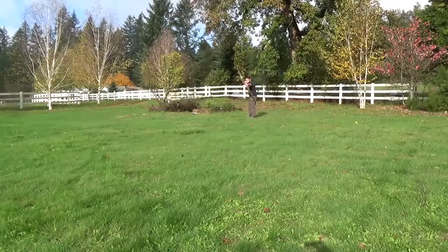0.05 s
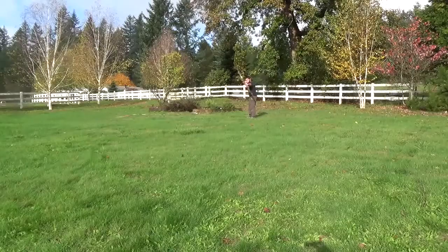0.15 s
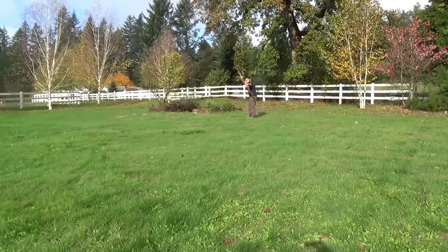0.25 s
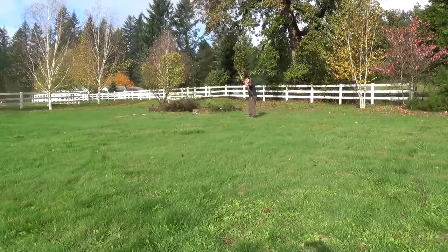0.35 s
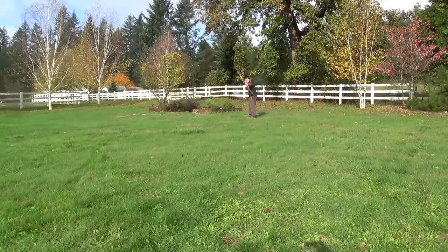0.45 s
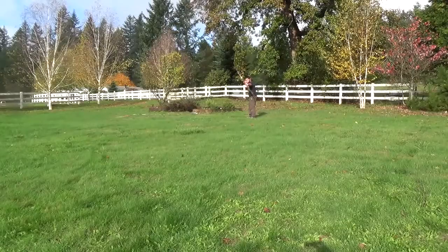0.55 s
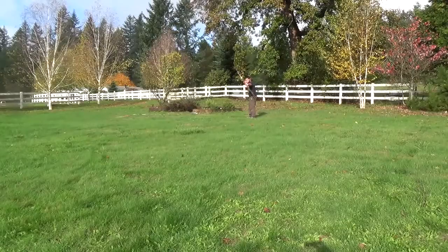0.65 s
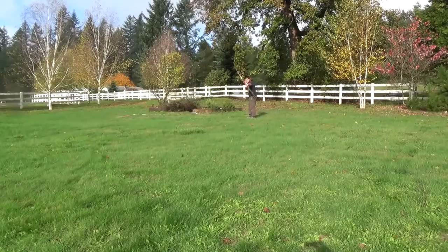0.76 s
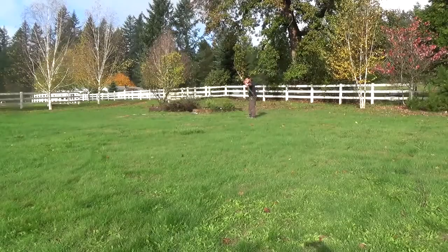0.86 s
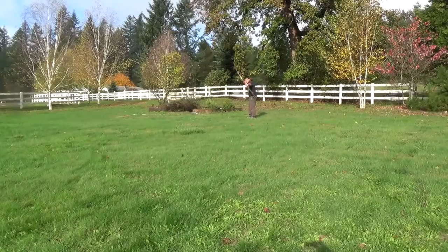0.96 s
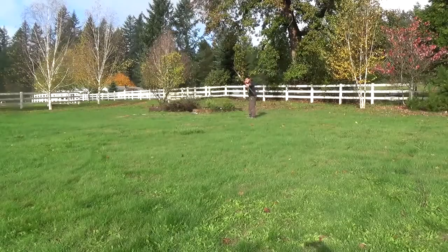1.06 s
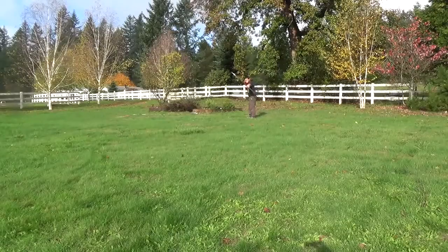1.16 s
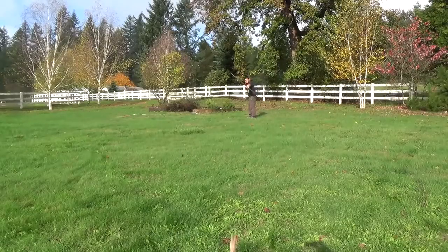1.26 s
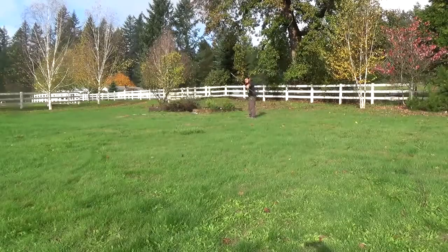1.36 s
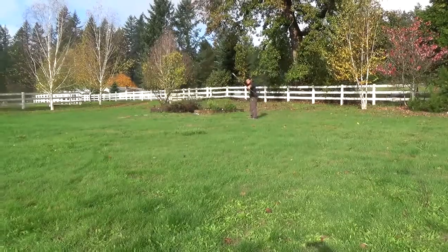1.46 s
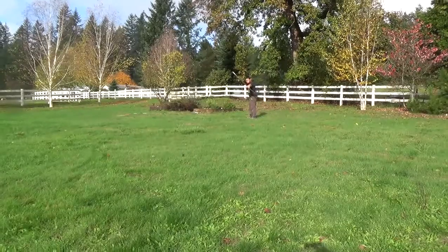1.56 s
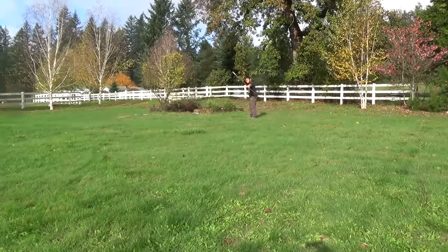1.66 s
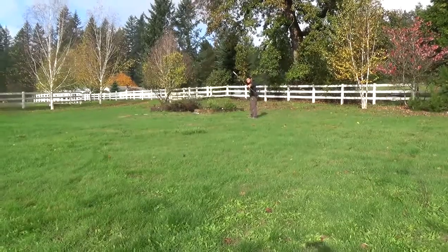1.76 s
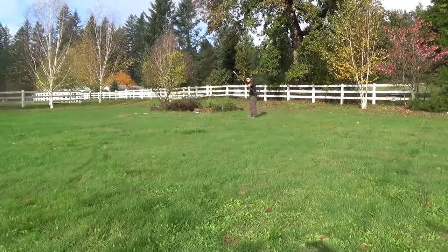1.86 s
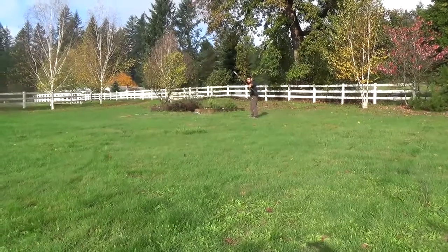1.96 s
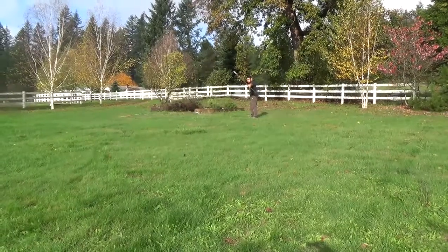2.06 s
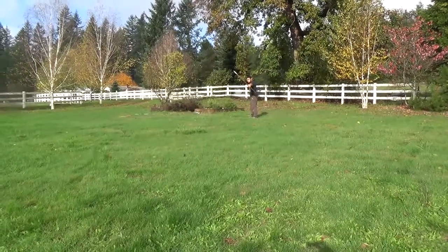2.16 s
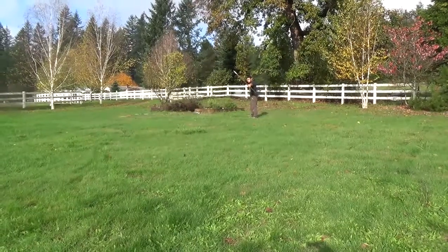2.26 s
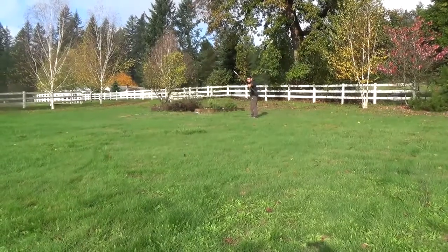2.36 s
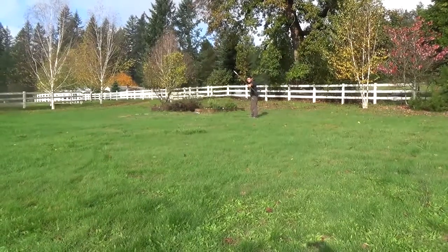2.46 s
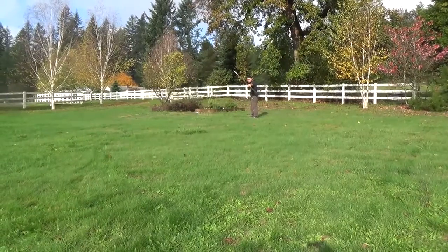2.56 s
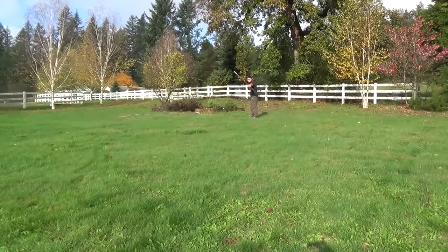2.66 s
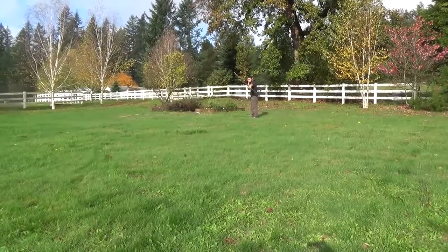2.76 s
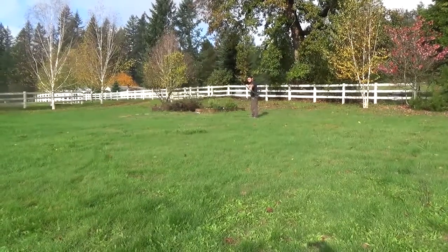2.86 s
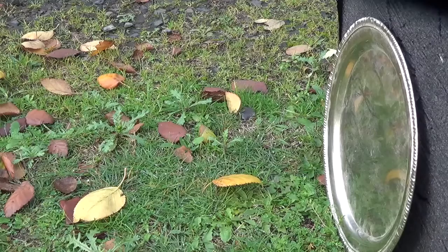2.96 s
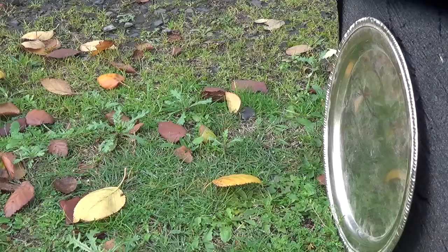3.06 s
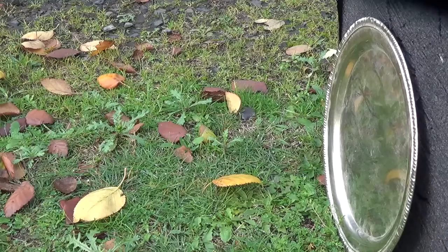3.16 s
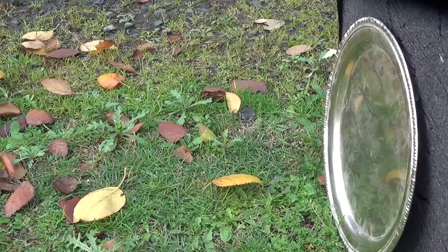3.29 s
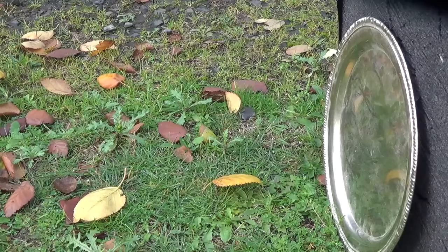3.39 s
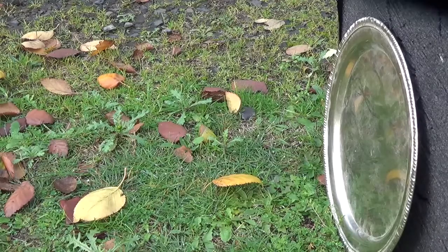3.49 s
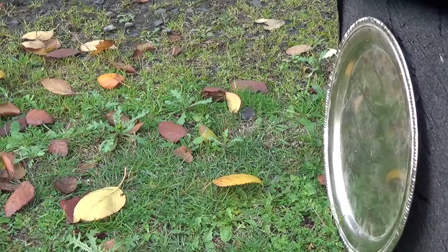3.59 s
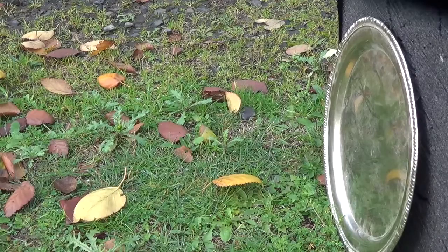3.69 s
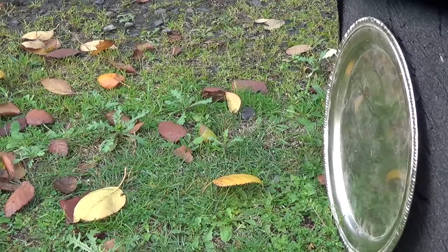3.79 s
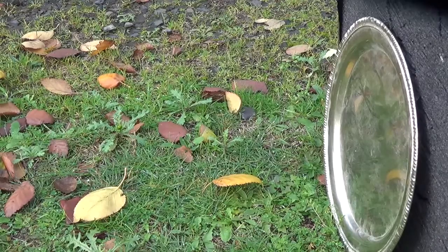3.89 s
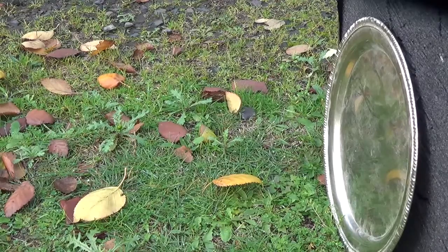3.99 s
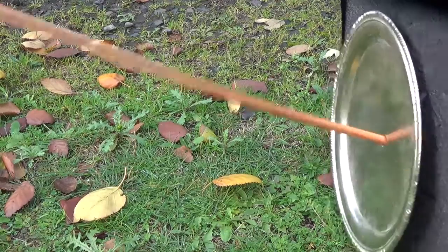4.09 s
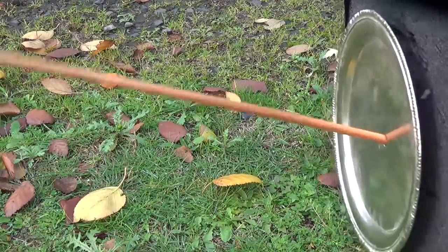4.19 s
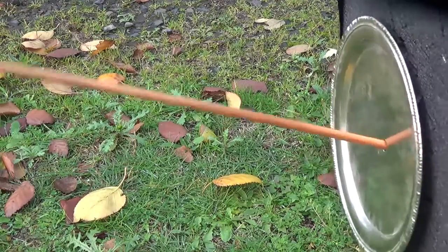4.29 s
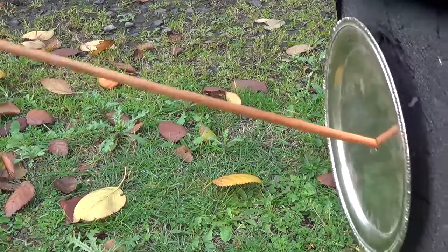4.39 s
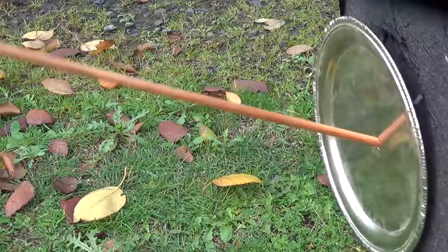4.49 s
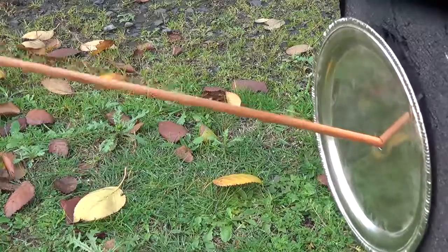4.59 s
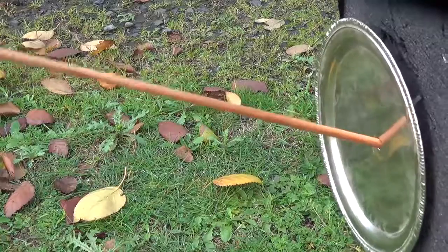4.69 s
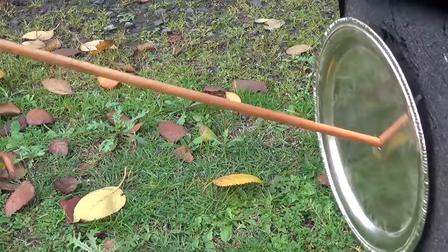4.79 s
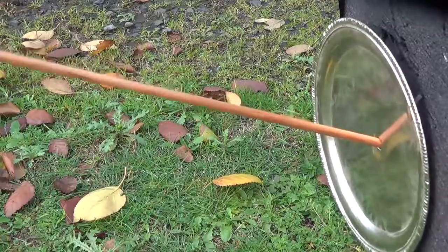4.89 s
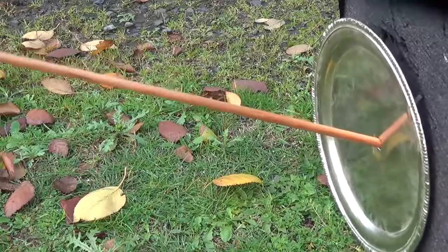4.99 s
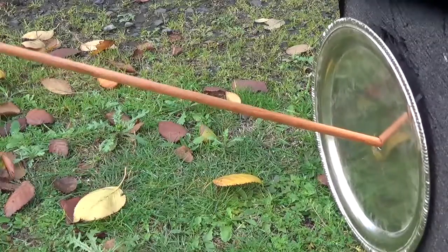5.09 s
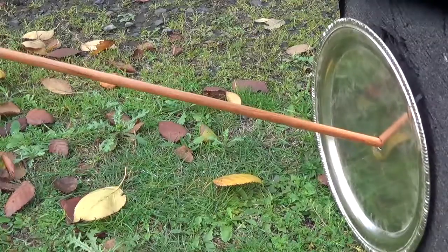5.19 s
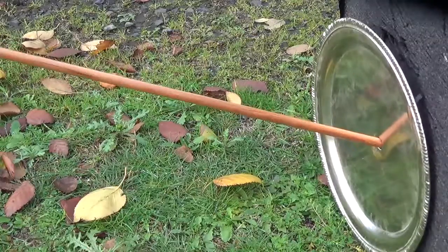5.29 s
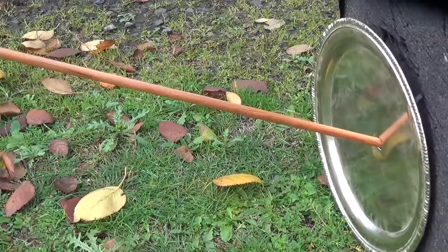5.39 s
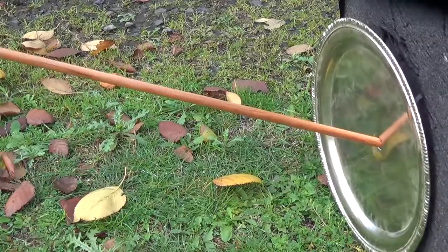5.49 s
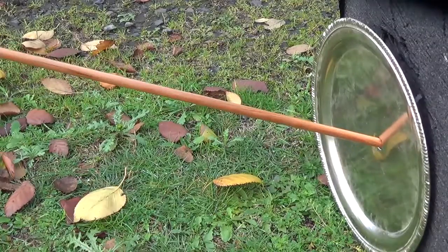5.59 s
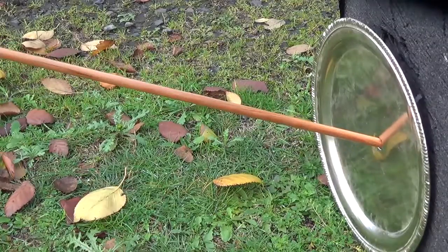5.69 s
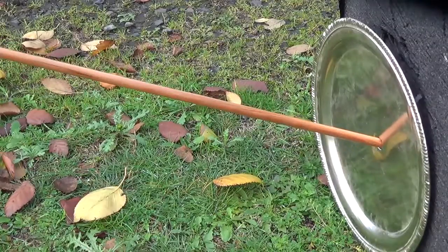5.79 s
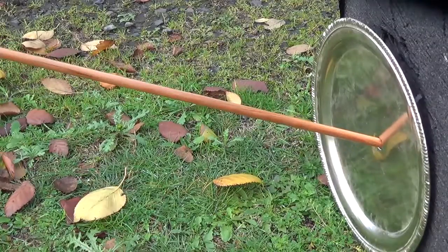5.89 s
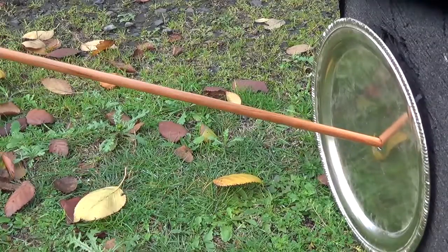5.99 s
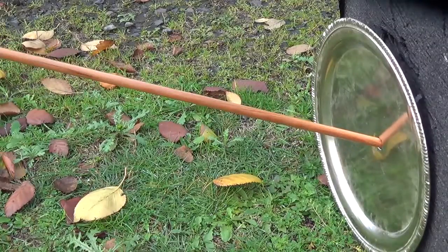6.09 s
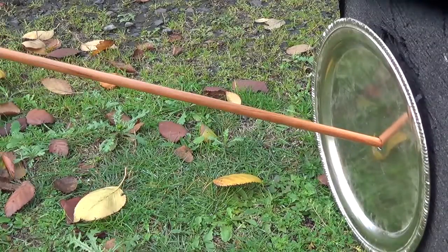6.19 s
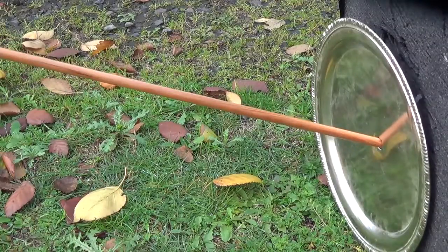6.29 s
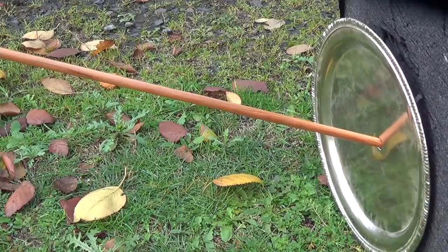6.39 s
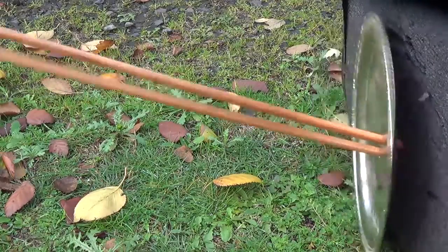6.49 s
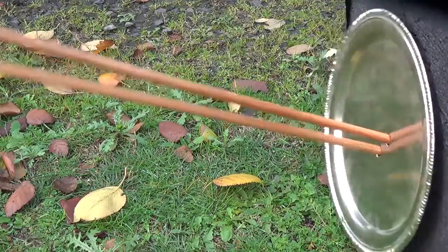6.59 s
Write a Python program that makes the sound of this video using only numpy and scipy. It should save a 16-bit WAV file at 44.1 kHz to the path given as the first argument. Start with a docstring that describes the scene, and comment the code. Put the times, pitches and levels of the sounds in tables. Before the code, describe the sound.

A quiet lawn: low uneven rumble, gentle air in trees, thin hiss, and a faint airy whistle around 0.3-0.5 s. At 1.14 s a distant wooden bow snaps very softly; its arrow's faint hiss swells until a loud, dry, sharp smack with a short thump at 1.39 s, right by the microphone. From 1.47 to 1.65 s wood clatters in irregular scrapes and knocks, strongest at 1.52, then soft dull thuds on grass until 2.0 s. At 3 s the air grows quieter, with a barely audible fast lens ticking. At 4.12 s a nearby bow clicks and twangs, and at 4.17 s an arrow cracks through a metal tray: a bright crash, buzzing and chattering, ringing for about half a second. A tiny settling tap comes at 4.8 s. Quiet returns until another bow release at 6.53 s and a second metallic crash at 6.58 s, buzzing less, still fading as it ends.

```python
"""Two arrows shot from close by pierce a metal tray on a quiet lawn: noise bursts for the crack, a
wash of noise and paired beating modes for the sheet that buzzes on the shaft and rings briefly.
Before them a far wooden bow snaps, its arrow hisses in as noise and smacks into the target by the
microphone, and wood clatters down onto the grass: short noise contacts, some with damped modes.
Behind lie a low rumble, air in the trees, thin hiss, faint far tones and a ticking lens drive."""
import sys
import numpy as np
from scipy import signal
from scipy.fft import rfft, irfft, next_fast_len
from scipy.io import wavfile
from scipy.ndimage import map_coordinates

SR = 44100
rng = np.random.default_rng(int(sys.argv[2]) if len(sys.argv) > 2 else 0)


def wav_record(signal):
    """Record a signal, one row per channel, as 16-bit PCM in the file named by sys.argv[1]."""
    frames = np.transpose(np.atleast_2d(signal))
    bounded = np.clip(frames, -1, 1)
    # unit amplitude maps onto the largest positive 16-bit level
    quanta = np.round(bounded * 32767).astype(np.int16)
    wavfile.write(sys.argv[1], SR, quanta)


N = 293265
T = np.arange(SR) / SR  # time since a blow (s)
CLOCK = np.arange(N) / SR  # time in the scene (s)
CLOSE_UP_S = 3.0  # the camera moves up to the tray
TOP_HZ = 11080  # upper limit of the noise colours

# bow shots: (release [s], click level [dB], string stop [s], slap level [dB], limb hum level [dB])
BOW_SHOTS = [(1.1400, -53, 1.1560, -51, -57), (4.1210, -43, 4.1365, -34.5, -37.5),
             (6.5313, -41, 6.5470, -45, -35.5)]
# colour of the string snapping taut and of the point cracking through: (frequency [Hz], level [dB])
SLAP_COLOUR = [(60, -6), (200, 1), (700, 2.5), (2500, -0.5), (5000, -4.5), (11000, -5)]
# the arrow driving into the target: (time [s], level [dB], length [s], t60 [s], tilt [dB/octave])
TARGET_ENTRY = [(1.3903, -13.5, .0018, 0.009, -0.5), (1.3949, -24, .004, .014, 0)]
# the tray's crowd of modes, read between these points:
# (frequency [Hz], level [dB], hold under full buzzing [s], t60 [s])
SHEET_CROWD = [(50, -34, 0.024, .6), (198.2, -4.5, 0.035, 1), (322, -6.5, .08, .9), (698, -4, 0.1, 0.84),
               (1050, 3.5, 0.14, .5), (1330, -7, 0.16, 0.56), (2150, -6, 0.17, 0.47),
               (2640, -1.5, 0.12, .38), (2770, -5.5, 0.14, 0.63), (2980, 2, 0.13, .35),
               (3730, 0, 0.13, 0.26), (5200, -3.5, .08, 0.42), (6200, -1.5, .045, 0.4),
               (10500, 3, 0.012, 0.29)]


def amp(db):
    """Decibels to gain."""
    return 10 ** (np.asarray(db) / 20)


def unit(x):
    """Scale to rms 1."""
    return x / np.sqrt(np.mean(x ** 2) + 1e-20)


def along(points, hz, axis=1):
    """One column of a table, read on a log-frequency axis."""
    columns = np.transpose(points)
    return np.interp(np.log(hz + 1), np.log(columns[0]), columns[axis])


def octaves(hz):
    """Octaves above about 2 kHz, flattening toward the deepest bass."""
    return np.log2((hz + 50) / 2000)


def filtered(x, response):
    """x times a response of frequency."""
    n = x.shape[-1]
    m = next_fast_len(n + SR // 4)
    spectrum = rfft(x, m) * response(np.fft.rfftfreq(m, 1 / SR))
    return irfft(spectrum, m)[..., :n]


def noise(colour, size, tilt_db=0):
    """Coloured noise of rms 1, thinned below 40 Hz and cut at TOP_HZ."""
    def response(hz):
        bass_cut = hz ** 2 / (hz ** 2 + 40 ** 2)
        return amp(along(colour, hz) + tilt_db * octaves(hz)) * (hz < TOP_HZ) * bass_cut

    return unit(filtered(rng.standard_normal(size), response))


def wobble(rate, size):
    """A smooth random curve, rate knots a second."""
    knots = rng.standard_normal(int(size * rate / SR) + 4)
    return map_coordinates(knots, [np.arange(size) * rate / SR])


def add(track, s, sound):
    """Mix a sound into the track at time s."""
    part = track[round(s * SR):][:len(sound)]
    part += sound[:len(part)]


def burst(colour, length, t60, tilt_db=0):
    """A contact: gritty noise that lasts for its length and then dies."""
    grit = unit(amp(1.4 * wobble(900, SR)))
    envelope = amp(-60 * np.maximum(T - length, 0) / t60)
    return grit * noise(colour, SR, tilt_db) * envelope


def ring(modes, attack=0.00016):
    """Damped modes struck together."""
    modes_sum = sum(amp(db - 60 * T / t60) * np.sin(2 * np.pi * hz * T) for hz, db, t60 in modes)
    return modes_sum * (1 - np.exp(-T / attack))


def panned(db):
    """Gains of the two channels for a left-right difference."""
    return amp([[db / 2], [-db / 2]])


def wide(colour, side_db):
    """Stereo noise of rms 1, its width set by the side level."""
    mid = noise(colour, N)
    side = amp(side_db) * noise(colour, N)
    return unit(np.array([mid + side, mid - side]))


def outdoors(x, pan, scatter, echo_db):
    """Place a small source: no deep bass radiates, near things scatter it, trees answer faintly and dully."""
    x = filtered(x, lambda hz: (1j * hz) ** 2 / (60 ** 2 + 1j * hz * 75 - hz ** 2))
    near = rng.standard_normal(SR) * amp(-60 * T / .06)
    scattered = signal.fftconvolve(x, near / np.linalg.norm(near))[:N]
    side = filtered(scattered, lambda hz: amp(along(scatter, hz)))
    far = rng.standard_normal((2, SR)) * amp(-60 * T / 1.3)
    far = filtered(far, lambda hz: 1 / (1 + (hz / 1400) ** 4))
    echo = signal.fftconvolve(x[None], far / np.linalg.norm(far[0]), axes=1)[:, :N]
    stereo = np.array([x + side, x - side]) + amp(echo_db) * echo
    return filtered(stereo, lambda hz: amp(np.outer([.5, -.5], along(pan, hz))))


def background():
    """Low rumble, air in the trees, thin hiss and far tones; trees and hiss are quieter by the tray."""
    # colours of the rumble, the trees and the hiss: (frequency [Hz], level [dB])
    rumble_colour = [(25, -10), (50, -4), (85, 3), (115, 0.5), (160, -6), (300, -18.5), (700, -59.5)]
    trees_colour = [(100, -23), (210, -0.5), (350, -3.5), (600, -3.5), (1050, -1), (2000, -9), (4000, -17),
                    (8000, -50)]
    hiss_colour = [(1500, -19.5), (3500, 0), (11000, -3.5)]
    # course of the rumble, before its overall gain: (time [s], level [dB])
    rumble_course = [(0.0, -74), (1.8, -72), (3.02, -78), (4.37, -69.5), (6.02, -80.5), (6.65, -74.5)]
    # two whistles and a drone:
    # (start [s], end [s], frequency [Hz], width [Hz], level [dB], left-right [dB])
    far_tones = [(0.31, 0.506, 1080, 120, -70, 3.5), (6.15, 6.77, 2640, 370, -75, 7),
                 (2.9, 4.25, 78, 5, -67.5, -16)]
    rumble_gain_db = 4.5

    close = CLOCK > CLOSE_UP_S
    rumble_db = rumble_gain_db + np.interp(CLOCK, *np.transpose(rumble_course))
    rumble = amp(rumble_db + 0.76 * wobble(8.2, N)) * wide(rumble_colour, side_db=-9.0)
    out = rumble * np.where(close, panned(-7.5), panned(-3))
    trees = amp(np.where(close, -71.5, -69)) * wide(trees_colour, side_db=-12)
    out += trees * np.where(close, panned(-2.5), panned(-.5))
    out += amp(np.where(close, -79.5, -74.7)) * wide(hiss_colour, side_db=-8.5)
    for start, end, hz, width_hz, db, pan_db in far_tones:
        progress = np.clip((CLOCK - start) / (end - start), 0, 1)
        swell = np.sqrt(np.abs(np.sin(np.pi * progress)))
        resonance = lambda f: 1 / (1 + (2 * (f - hz) / width_hz) ** 2)
        tone = unit(filtered(rng.standard_normal(N), resonance))
        out += amp(db) * swell * tone * panned(pan_db)
    return out


def camera_ticks():
    """By the tray the lens drive ticks faintly and unevenly each frame, brighter on every other one."""
    frame_rate = 29.97  # frames per second
    frame, since = np.divmod(CLOCK - 3.017, 1 / frame_rate)
    pulse = np.exp(-((since - .004) / 0.0027) ** 2) * (CLOCK > CLOSE_UP_S)
    lower = amp(-72.5 + 1.5 * wobble(30, N)) * np.sin(2 * np.pi * 2900 * since)
    upper = amp(-78.0 + 1.5 * wobble(30, N)) * np.sin(2 * np.pi * 3300 * since) * (frame % 2 == 0)
    return pulse * (lower + upper)


def soft_thuds():
    """Wood landing on the grass, and at 4.80 s the tray settling: short noise contacts, damped alike."""
    # each thud: (time [s], level [dB], tilt [dB/octave])
    thuds = [(1.751, -50, -13), (1.786, -50.5, 1.5), (1.8544, -39.5, .5), (1.879, -55, -8),
             (1.999, -59.5, 2.5), (4.803, -62, 5)]
    # colour of the thuds: (frequency [Hz], level [dB])
    thud_colour = [(60, -9.5), (250, 11), (650, 1), (1300, -6.5), (2500, -23.5), (5000, -33), (11000, -39)]
    out = np.zeros(N)
    for s, db, tilt_db in thuds:
        add(out, s, amp(db) * burst(thud_colour, length=0.0032, t60=0.078, tilt_db=tilt_db))
    return out


def clatter():
    """Wood scrapes and knocks; the point of contact decides which of its modes ring most."""
    # each contact: (time [s], level [dB], length [s], tilt [dB/octave], favoured frequency [Hz])
    wood_contacts = [(1.4705, -47.5, .001, -4.5, 1570), (1.476, -46.5, 0.0011, -4, 1050),
                     (1.505, -47, .016, 1.5, 3500), (1.5243, -25.3, 0.0031, 0.5, 2150),
                     (1.532, -35.5, 0.0092, -3.5, 480), (1.5433, -36.5, 0.0024, -0.5, 2150),
                     (1.558, -42.5, 0.0093, -0.5, 240), (1.574, -35, .006, -1.1, 2150),
                     (1.591, -38.5, .001, 2.5, 1570), (1.622, -39.5, 0.00092, 1, 2150),
                     (1.637, -49.5, 0.0055, 0, 1050), (1.694, -63.5, 0.0026, 2, 3500),
                     (1.808, -62, .0044, 2.5, 3500)]
    # colour of the contacts: (frequency [Hz], level [dB])
    wood_colour = [(60, -7.5), (230, 5.5), (500, 0.5), (1000, 4.5), (1500, -4.5), (2150, 1), (3000, -8.5),
                   (6000, -12.5), (11000, -15)]
    # modes of the wood: (frequency [Hz], level at the favoured pitch over the ring level [dB], t60 [s])
    wood_modes = [(240, 7, 0.17), (480, 4.5, 0.066), (1050, 3, .042), (1570, 5, .035), (2150, 2, 0.027),
                  (3500, 4, 0.022)]
    favour_db_per_octave = 14  # how fast the ring weakens away from the favoured pitch
    # contacts over hard_db press on the wood: choke is the share of the excess dB that does not ring
    hard_db, choke = -38.5, .6

    out = np.zeros(N)
    for s, db, length, tilt_db, favoured_hz in wood_contacts:
        ring_db = db - choke * max(db - hard_db, 0)
        modes = []
        for hz, mode_db, t60 in wood_modes:
            distance_octaves = abs(np.log2(hz / favoured_hz))
            modes.append((hz, mode_db - favour_db_per_octave * distance_octaves, t60))
        contact = amp(db) * burst(wood_colour, length, t60=.037, tilt_db=tilt_db)
        add(out, s, contact + amp(ring_db) * ring(modes, attack=0.0007))
    return out


def flight():
    """From the first release to impact the fletching hisses, louder as the distance shrinks."""
    arrival_db, miss_m, speed_m_per_s = -51, 0.99, 82  # level on arrival, nearest distance, arrow speed
    fletching_colour = [(300, -2), (2500, 0.5), (7000, -0.5), (11000, 0.95)]  # (frequency [Hz], level [dB])
    release, arrival = BOW_SHOTS[0][0], TARGET_ENTRY[0][0]
    distance = miss_m + speed_m_per_s * np.abs(arrival - CLOCK)
    airborne = (CLOCK > release) & (CLOCK < arrival)
    return amp(arrival_db) * miss_m / distance * airborne * noise(fletching_colour, N)


def target_hit():
    """The arrow tears into the target and stops with a thump that sets it ringing."""
    # colour of the smack: (frequency [Hz], level [dB])
    smack_colour = [(60, -9.5), (200, -2), (500, 3), (1200, -2), (2000, 3), (3000, -7.5), (6000, -9.5),
                    (11000, -11.5)]
    # modes of the target: (frequency [Hz], level [dB], t60 [s])
    target_modes = [(110, -34.5, 0.26), (194, -31.5, .08), (298, -28.5, .19), (524, -19.5, 0.043),
                    (570, -38, .06), (730, -8, 0.0086), (1050, -17.5, 0.0062)]
    out = np.zeros(N)
    for s, db, length, t60, tilt_db in TARGET_ENTRY:
        add(out, s, amp(db) * burst(smack_colour, length, t60, tilt_db))
    # the small target face radiates little bass
    thump = filtered(ring(target_modes), lambda hz: (1j * hz / (110 + 1j * hz)) ** 2)
    add(out, 1.3991, thump)
    add(out, 1.400, amp(-40) * burst(smack_colour, length=0.0022, t60=0.037, tilt_db=2.1))
    return out


def bow():
    """The arrow clicks off the string; the string snaps taut, the departing arrow hisses, and the limbs hum."""
    # colour of the arrow leaving the string: (frequency [Hz], level [dB])
    click_colour = [(200, -11.5), (900, -11), (2100, 2.5), (3600, -8.5), (5500, -18.5), (11000, -22.5)]
    # modes of the limbs: (frequency [Hz], level over the shot's hum level [dB], t60 [s])
    limb_modes = [(189.5, 0, 0.25), (123, -11.5, 0.067), (390, -9, 0.092)]
    out = np.zeros(N)
    for release, click_db, stop, slap_db, hum_db in BOW_SHOTS:
        add(out, release, amp(click_db) * burst(click_colour, length=.004, t60=0.072))
        add(out, stop, amp(slap_db) * burst(SLAP_COLOUR, length=0.0041, t60=0.02))
        # the hiss of the arrow flying off
        add(out, stop, amp(hum_db - 15.5) * burst(SLAP_COLOUR, length=.018, t60=.07))
        add(out, stop + .002, amp(hum_db) * ring(limb_modes))
    return out


def tray_modes(hz, db, t60, buzz):
    """The buzzing sheet feeds its modes and makes them waver; then they die freely."""
    hold = buzz * along(SHEET_CROWD, hz, axis=2)
    knee = 0.018  # softness of the turn from held to free (s)
    free = knee * np.logaddexp(0, (T - hold[:, None]) / knee)
    swell = 1 - 0.5 * np.exp(-T / 0.013)
    # the swinging shaft trades energy between the modes and bends their pitch
    trade_db = 2.6 * np.array([wobble(30, SR) for _ in hz])
    bend = 0.75 * np.array([wobble(45, SR) for _ in hz]) * np.exp(-T / .5)
    turn, twin_turn, split = rng.random((3, len(hz), 1))
    phase = 2 * np.pi * (hz[:, None] * T + turn) + bend
    # the round tray's modes come in close pairs that beat, up to 14 Hz apart
    twin = amp(-6.5) * np.sin(phase + 2 * np.pi * (28 * (split - .5) * T + twin_turn))
    envelope = amp(db[:, None] - 1 + trade_db - 60 * free / t60[:, None])
    return swell * np.sum(envelope * (np.sin(phase) + twin), axis=0)


def tray_wash(buzz, tilt_db):
    """Hundreds of uneven, overlapping modes merge into a crash that loses its treble first."""
    grid = np.arange(0, SR / 2, 18)  # one random strength every 18 Hz
    strengths = amp(3.8 * rng.standard_normal(len(grid)))
    crowd = unit(filtered(rng.standard_normal(SR), lambda hz: np.interp(hz, grid, strengths)))
    hz, t, z = signal.stft(crowd, SR, nperseg=512)
    db, hold, t60 = (along(SHEET_CROWD, hz, axis=k)[:, None] for k in range(1, 4))
    knee = 0.026  # softness of the turn from held to free (s)
    free = knee * np.logaddexp(0, (t - buzz * hold) / knee)
    decay = amp(db + tilt_db * octaves(hz)[:, None] - 60 * free / t60)
    return signal.istft(z * decay, SR, nperseg=512)[1][:SR]


def tray():
    """The steel point cracks through; the sheet crashes, chatters on the shaft and rings."""
    # arrows through the tray:
    # (time [s], level [dB], main modes' trim [dB], share of the full buzz time [1], tilt [dB/octave])
    tray_hits = [(4.1676, -0.5, 0, 0.93, 1), (6.579, 0, -5.5, 0.49, 0.4)]
    # the strongest modes, before each hit's trims: (frequency [Hz], level [dB], t60 [s])
    main_modes = [(209.7, -46, .8), (736, -48.5, 1.4), (923, -42, 0.74), (1005, -39, .45),
                  (1109, -39.5, 0.41), (1214, -40, 0.41), (1944, -33.5, 0.55), (1984, -39.5, 0.52),
                  (2263, -46.5, 0.61), (2570, -41.5, 0.65), (2606, -44, 0.38), (2856, -39, 0.6),
                  (2994, -34.5, 0.47), (3190, -38.5, 0.5), (3235, -37.5, .36), (3340, -40.5, .3),
                  (3456, -41, .3), (3595, -39.5, 0.42), (3812, -34.5, .28), (3748, -34, .28),
                  (3973, -43, 0.44), (4231, -43.5, .3), (4460, -38.5, 0.25), (4650, -31.5, 0.345),
                  (4703, -35, 0.39), (5740, -38.5, 0.42), (6300, -42, 0.43), (8496, -39, .26),
                  (8474, -39.5, 0.21), (9940, -39.5, .26)]
    out = np.zeros(N)
    hz, db, t60 = np.transpose(main_modes)
    for s, level_db, modes_db, buzz, tilt_db in tray_hits:
        chatter = amp(1.2 * wobble(350, SR) + 1.7 * wobble(60, SR))
        wash = amp(-20) * chatter * tray_wash(buzz, tilt_db)
        add(out, s, amp(level_db - 23) * burst(SLAP_COLOUR, length=0.0018, t60=0.034))
        add(out, s, amp(level_db) * (wash + tray_modes(hz, db + modes_db, t60, buzz)))
    return out


def scene():
    """All sources on the lawn, placed about the target or about the tray."""
    # where target and tray stand: (frequency [Hz], left-right [dB])
    target_pan = [(60, -9.5), (170, -2.5), (490, 0.5), (1410, 0.0), (4030, -0.5), (11500, 0.0)]
    tray_pan = [(60, -8.0), (170, -4), (490, -3), (1410, -2.0), (4030, -1.5), (11500, -1.5)]
    # sound scattered near each of them: (frequency [Hz], level [dB])
    target_scatter = [(60, -7), (220, -12.5), (830, -16), (3100, -14), (11500, -11)]
    tray_scatter = [(60, -1.5), (220, -7), (830, -13), (3100, -15.5), (11500, -12.5)]
    # the soft thuds all share the target's placement
    at_target = flight() + target_hit() + clatter() + soft_thuds()
    target = outdoors(at_target, target_pan, target_scatter, echo_db=-39.5)
    close = outdoors(tray() + bow(), tray_pan, tray_scatter, echo_db=-32.5)
    return target + close + background() + camera_ticks()


def record(dry):
    """The camera's microphone thins the deepest bass and keeps next to nothing above its band limit."""
    thinned = filtered(dry, lambda hz: 1j * hz / (30 + 1j * hz))
    # 1 dB down for every 12 Hz above the edge
    return filtered(thinned, lambda hz: amp(-np.clip((hz - TOP_HZ + 100) / 12, 0, 100)))


dry = scene()
out = record(dry)
wav_record(out)
```